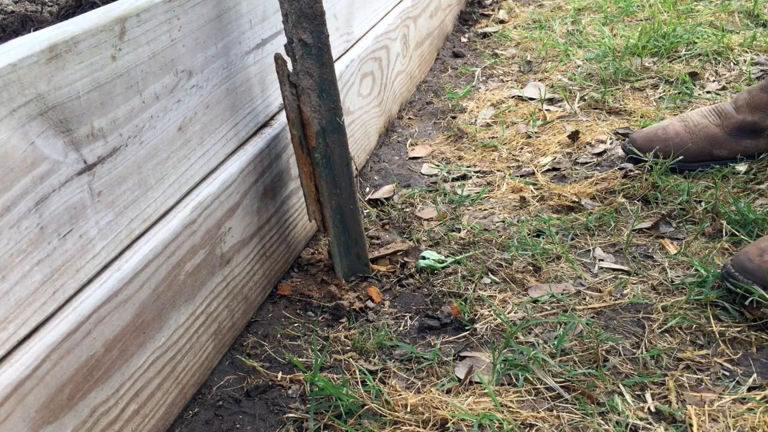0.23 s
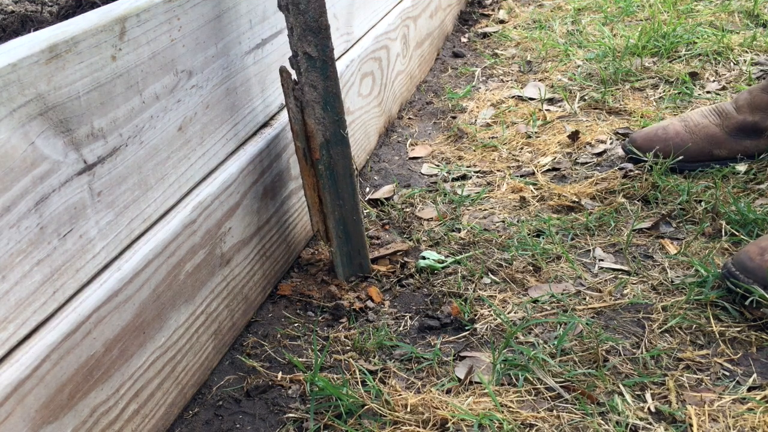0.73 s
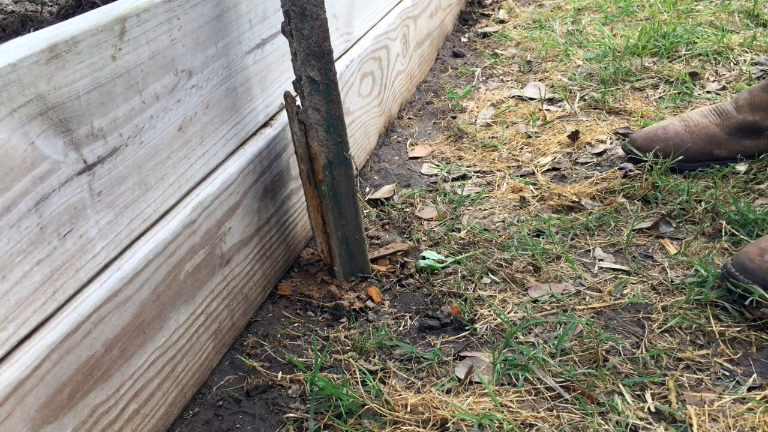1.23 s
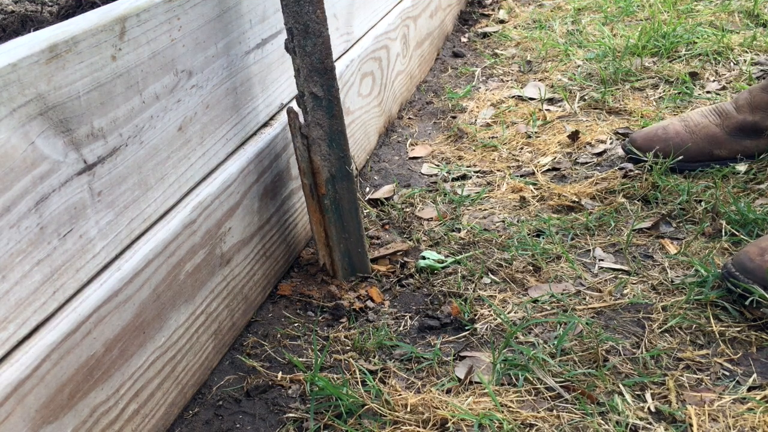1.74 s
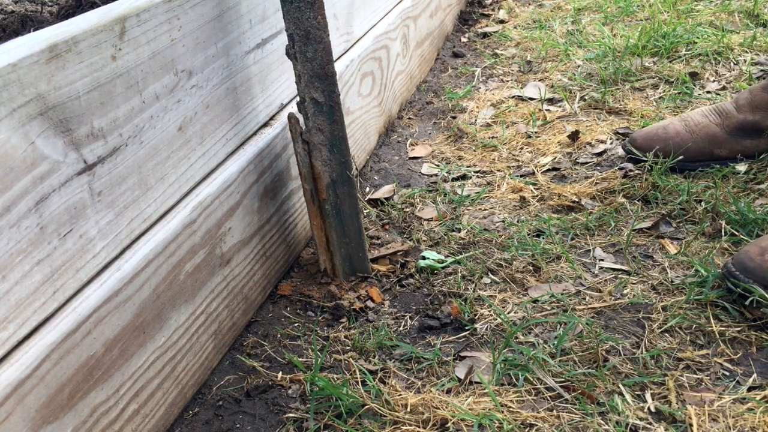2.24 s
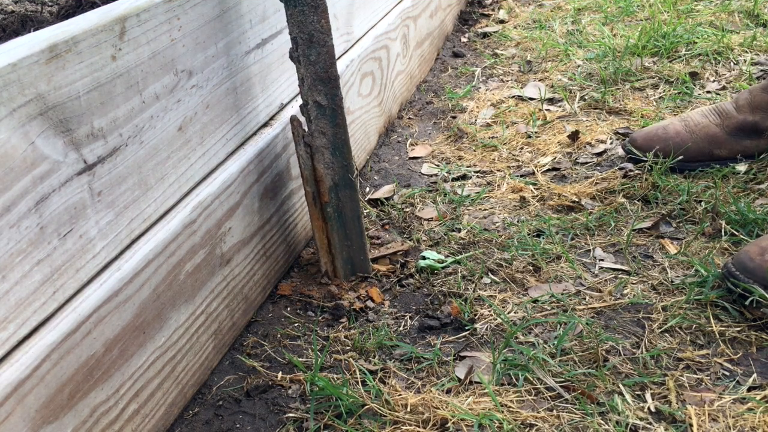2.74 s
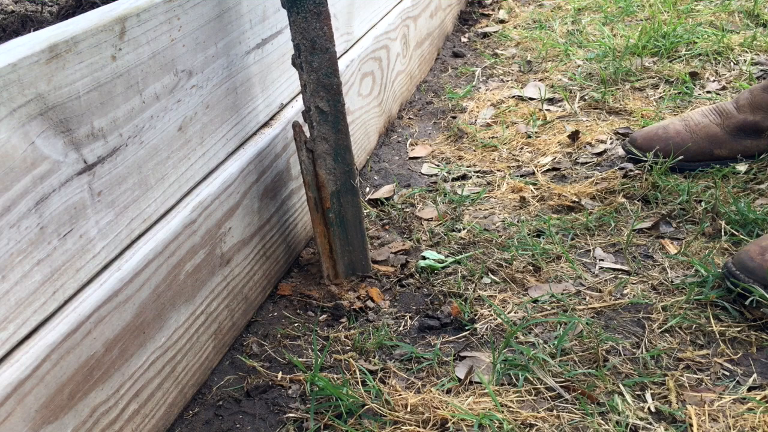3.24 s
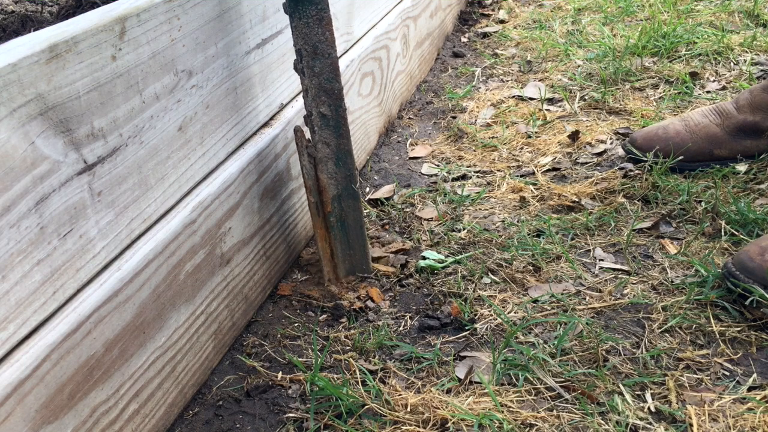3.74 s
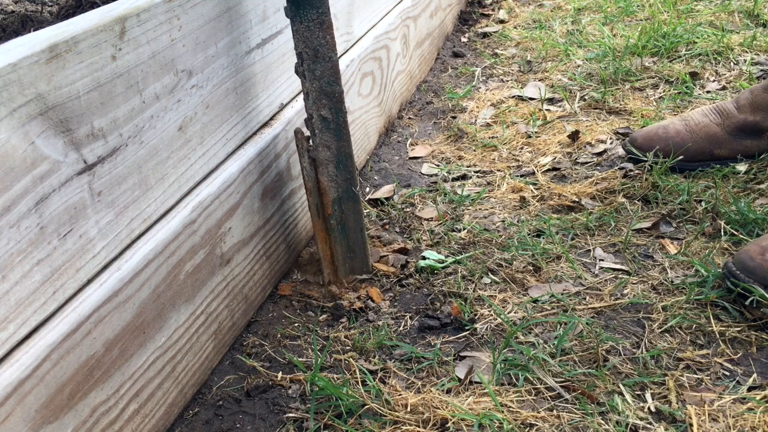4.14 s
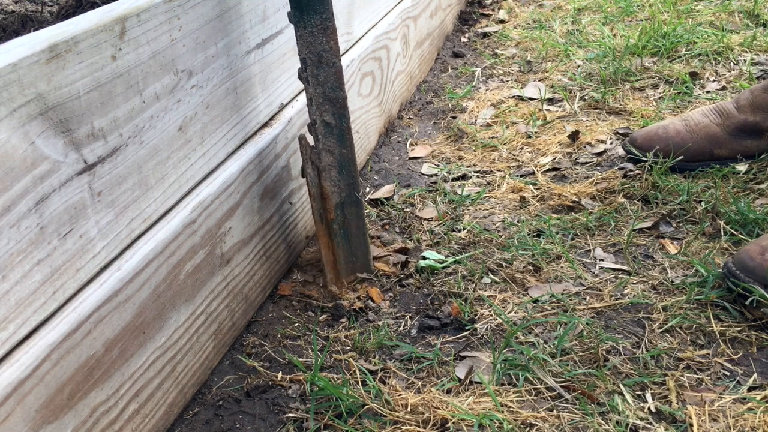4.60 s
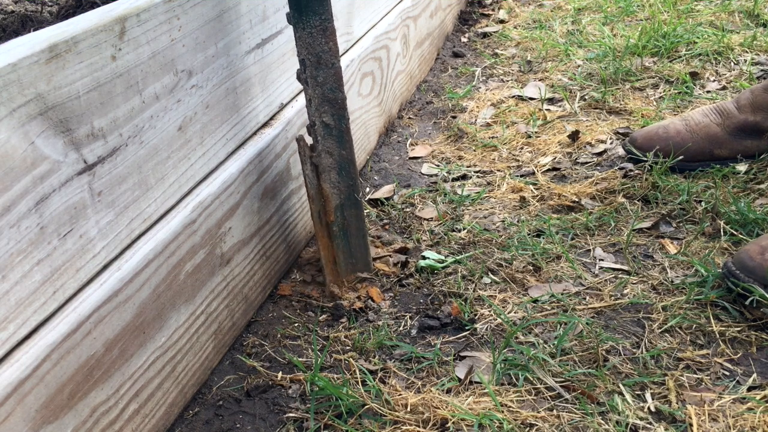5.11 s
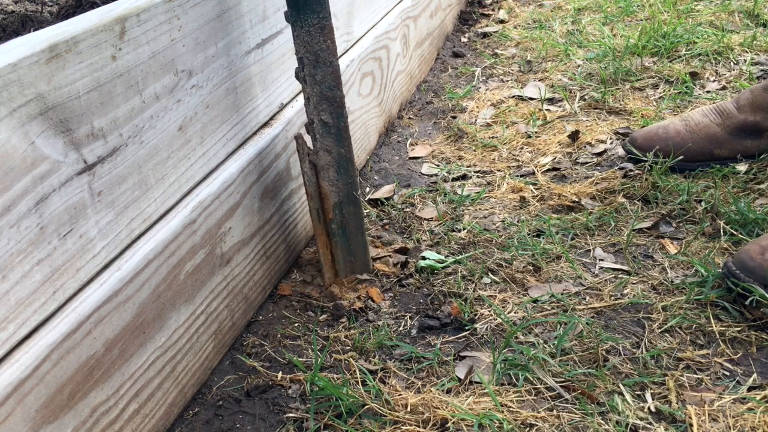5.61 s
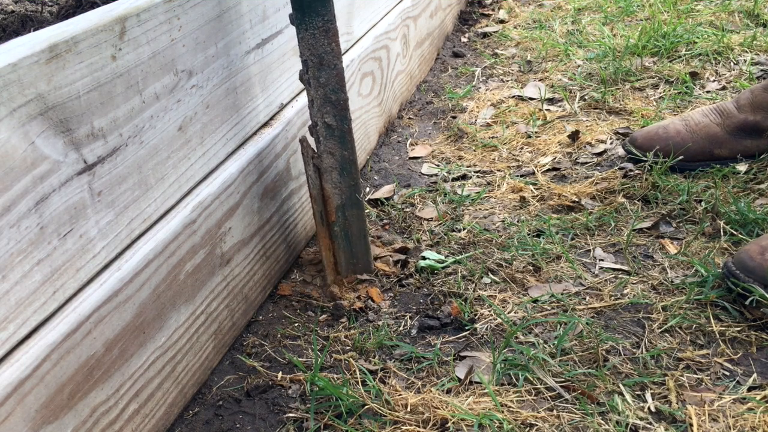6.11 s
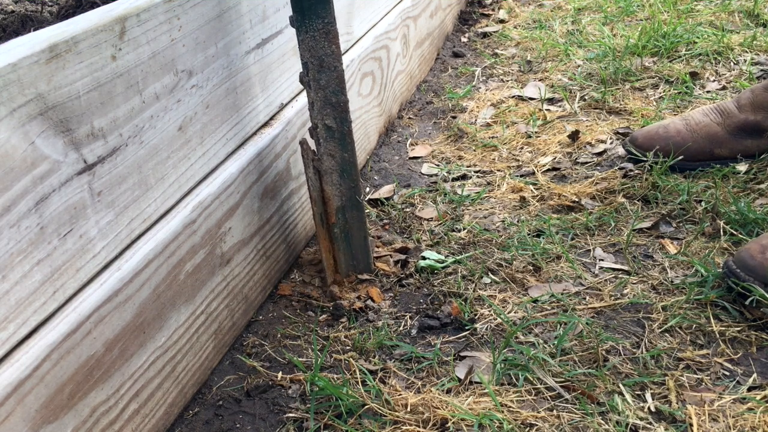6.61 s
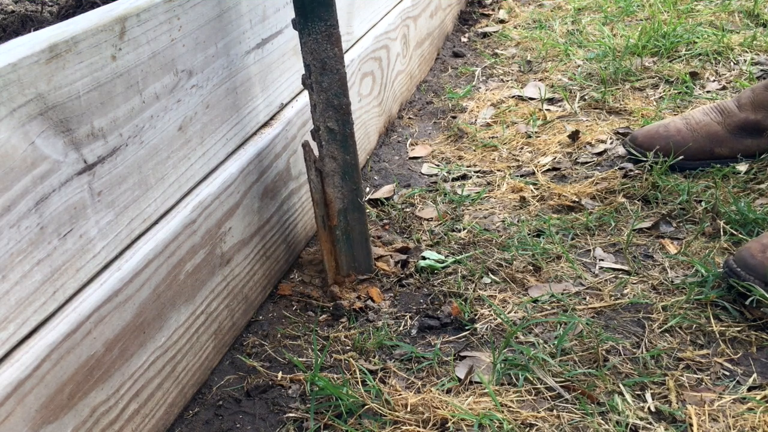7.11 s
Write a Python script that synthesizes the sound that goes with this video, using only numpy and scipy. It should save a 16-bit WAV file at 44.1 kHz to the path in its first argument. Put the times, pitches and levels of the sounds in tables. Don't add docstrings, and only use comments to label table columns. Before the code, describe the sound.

Very close to the microphone, a heavy steel driver strikes a metal fence post in a garden. A leftover echo cuts off, then about a dozen hard blows follow, roughly two a second. Each is a short, choked, clipping clang with a quick rattling bounce, low soil thud and brief ring. Walls return distinct slaps and a bright tail over faint wind and distant air.

```python
import sys
import numpy as np
from scipy import signal
from scipy.fft import rfft, irfft
from scipy.io import wavfile

SR = 44100
rng = np.random.default_rng(int(sys.argv[2]) if len(sys.argv) > 2 else 0)


def amplitude_ratio(level_db):
    exponent = np.asarray(level_db, float) / 20
    return 10 ** exponent


def transcribe(u):
    v = np.clip(np.atleast_2d(u).T, -1, 1)
    q = np.round(v * 32767).astype(np.int16)
    wavfile.write(sys.argv[1], SR, q)


N = 324135


def in_hz(points, hz):
    table_hz, value = np.transpose(points)
    return np.interp(np.log(hz + 1), np.log(table_hz), value)


def coloured(spectrum, size):
    hz = np.arange(size // 2 + 1) * SR / size
    x = irfft(rfft(rng.standard_normal(size)) * amplitude_ratio(in_hz(spectrum, hz)), size)
    return x / np.sqrt(np.mean(x ** 2))


def add(out, start_s, x):
    i = round(start_s * SR)
    skip = max(-i, 0)
    out[i + skip:i + len(x)] += x[skip:N - i]


def struck(hz, level_db, t60, t):
    hz, level_db, t60 = np.array([hz, level_db, t60])[:, :, None]
    phase = 2 * np.pi * rng.random(hz.shape)
    modes = amplitude_ratio(level_db - 60 * t / t60) * np.sin(2 * np.pi * hz * t + phase)
    return np.sum(modes, 0)


def flutter(t, depth_db, rate_hz):
    steps = rng.standard_normal(size=200)
    return amplitude_ratio(depth_db * np.interp(t * rate_hz, np.arange(len(steps)), steps))


# freq_hz, density_db (per Hz)
AIR_SPECTRUM = [(20, -9), (95, -2), (200, -13), (330, -19), (2200, -28.5), (4000, -33), (8000, -40.5),
                (16000, -48)]


def distant_air():
    return amplitude_ratio(-58) * coloured(AIR_SPECTRUM, N)


def wind():
    gust_band = signal.butter(4, [1.2, 16], "band", fs=SR, output="sos")
    gusts = signal.sosfilt(gust_band, rng.standard_normal(N + SR))[SR:]
    return amplitude_ratio(-47) * gusts / np.std(gusts)


# delay_s, level_db, brightness_db (per octave)
WALL_ECHOES = [
    (0.0694, 9, -3),
    (0.1009, 5.5, -1.5),
    (0.133, 1.5, -1.5),
    (0.1803, -5, -5),
    (0.253, -5, -4),
    (0.308, -14, -2.5),
    (.37, -14, -3.5),
]
# freq_hz, t60_s
YARD_DECAY = [(300, 0.25), (1500, 0.9), (3500, 0.98), (8000, 0.95), (12000, .5), (16000, 0.33)]
# freq_hz, level_db
YARD_TONE = [(200, -24.5), (900, -23), (1500, -14), (2200, -8.5), (5000, -9), (9000, -3), (12000, -5),
             (16000, -7)]


def yard_response():
    t = np.arange(SR) / SR
    response = np.zeros(SR)
    edges_hz = 180 * 2 ** np.arange(0, 6.8, .25)
    white = rng.standard_normal((2, SR)) * flutter(t, 2, 65)
    smear = rng.standard_normal(SR // 40) * np.exp(-t[:SR // 40] / .002)
    smear /= np.linalg.norm(smear)
    delay_s, level_db, bright_db = np.transpose(WALL_ECHOES)
    for k, (low, high) in enumerate(zip(edges_hz, edges_hz[1:])):
        hz = np.sqrt(low * high)
        tail_in = np.clip((t - .03) / 0.025, 0, 1)
        tail = amplitude_ratio(-32.5 - 60 * t / in_hz(YARD_DECAY, hz)) * tail_in * white[k % 2]
        echoes = np.zeros(SR)
        echo_db = level_db - 11.5 + bright_db * np.log2(hz / 2500)
        echoes[(delay_s * SR).astype(int)] = amplitude_ratio(echo_db) * (-1) ** k
        sound = tail + signal.fftconvolve(echoes, smear)[:SR]
        band = signal.butter(2, [low, high], "band", fs=SR, output="sos")
        response += amplitude_ratio(in_hz(YARD_TONE, hz)) * signal.sosfilt(band, sound)
    return response


# freq_hz, t60_s
GROUND_MODES = [
    (65.4, 0.43),
    (144.4, 0.32),
    (105, 0.095),
]


def ground_thud(drive_db, square_db, soil_db, t):
    hz, t60 = np.transpose(GROUND_MODES)
    plank_db = -40 - 0.2154 * square_db
    jolt_db = -33 + 0.5 * drive_db
    return struck(hz, [soil_db, plank_db, jolt_db], t60, t) * np.minimum(t / 0.0039, 1)


# freq_hz, level_db (against the yard share), t60_s
DRIVER_HUM = [(2136, -19.5, 0.81), (2160, -21, 0.8), (1770, -25, 0.58), (2486, -25.5, 1), (2600, -25, 0.42)]


def driver_hum(drive_db, yard_db, t):
    level = amplitude_ratio(yard_db + 0.47 * drive_db)
    swell = np.minimum(t / 0.065, 1)
    return level * struck(*np.transpose(DRIVER_HUM), t) * swell * flutter(t, 4, 49)


# multiple (of POST_HZ), t60_s, wall_db (extra towards the walls),
# level_db, growth_db (per dB of squareness)
POST_WAVES = [(2, 0.07, -1, -5.5, 0.68), (3, 0.089, -3, -10, 1.3), (5, 0.11, 1, -15, 1.73),
              (6, 0.064, 5.5, -14, 1.25), (10, 0.038, -10.5, -21.5, 3.05)]
POST_HZ = 1260.5


def post_ring(square_db, t):
    multiple, t60, wall_db, base_db, growth = np.transpose(POST_WAVES)
    hz, ring_db = multiple * POST_HZ, base_db + growth * square_db
    near = np.zeros(len(t))
    for mode_hz, mode_db, mode_t60 in zip(hz, ring_db, t60):
        near += struck([mode_hz], [mode_db], [mode_t60], t) * flutter(t, 4.5, 140)
    return near, struck(hz, ring_db + wall_db, t60, t)


# freq_hz, level_db, longer (t60 relative to the blow)
BENDING_MODES = [(913, -20.5, 0.67), (1105.5, -19, 0.54), (1287.3, -14.5, 0.64), (1509.5, -16, 0.74),
                 (1815.6, -16, 1), (1986, -15, 0.8), (2186, -25, 1.1), (2188, -10, 0.64), (2250, -10, 0.38),
                 (2897, -16, 0.81), (3060, -13.5, 0.95), (3301, -7, 0.49), (3458, -9, 0.69),
                 (3642, -11, 0.45), (3951, -10, 0.64), (4205, -16, 0.86), (4516, -11, 0.5),
                 (4717, -16, 0.25), (4832, -14, 0.4), (5118, -12, 0.4), (5210, -13.5, 0.13),
                 (6180, -24.5, 0.41), (6850, -23, 1.1), (8370, -19.5, 0.11), (8400, -18.5, 0.51),
                 (8900, -32.5, 0.29)]
# freq_hz, density_db (per Hz)
CRASH_SPECTRUM = [(40, -32), (130, -14), (450, -10.5), (1500, -6.5), (2300, 4.5), (3500, -3), (6000, -3.5),
                  (10000, -14.5), (15500, -26.5), (17000, -57)]


def clang(t60):
    t = np.arange(SR // 4) / SR
    rattle = np.interp(t, np.arange(100) / 400, rng.standard_normal(100))
    hz, level_db, longer = np.transpose(BENDING_MODES)
    level_db = level_db + 3.0 * rng.standard_normal(len(hz))
    crash = amplitude_ratio(-6.0) * coloured(CRASH_SPECTRUM, len(t)) * amplitude_ratio(-60 * t / (0.85 * t60))
    modes = amplitude_ratio(-2) * struck(hz, level_db, t60 * longer, t)
    contact = np.minimum(t / 0.0016, 1) ** 2
    return (modes + crash) * contact * amplitude_ratio(2.5 * rattle)


def earlier_tail(room):
    t = np.arange(N) / SR
    multiple, t60, _, base_db, _ = np.transpose(POST_WAVES)
    ring = struck(multiple * POST_HZ, base_db - 4, t60, t[:SR // 4])
    blow = amplitude_ratio(-22) * (clang(0.093) + ring)
    tail = np.zeros(N)
    add(tail, -.19, signal.fftconvolve(blow, room))
    return tail + .045 * np.sin(2 * np.pi * 4.3 * t)


# start_s, drive_db, t60_s
BOUNCES = [(0.5254, -7, 0.03), (0.5318, -14, 0.046), (0.994, -16, 0.08), (1.5600, -8, 0.083),
           (1.5750, -13, 0.036), (2.069, -5, 0.057), (2.563, -12, 0.085), (3.0600, 1, 0.061),
           (3.0750, -5.5, 0.03), (3.5850, 1, 0.07), (3.599, -19, 0.069), (4.086, -3.5, 0.072),
           (4.6170, -3, 0.09), (5.149, -14, 0.1), (5.854, -6.5, 0.11), (5.875, -9.5, 0.048),
           (6.447, 1.5, 0.077), (6.464, -13.5, 0.092), (7.022, -2.5, 0.093), (7.0400, -16.5, 0.057)]


def hit_with_bounces(start_s, drive_db, t60):
    hit = np.zeros(SR * 3 // 4)
    add(hit, 0, amplitude_ratio(drive_db) * clang(t60))
    for bounce_s, bounce_db, bounce_t60 in BOUNCES:
        if 0 < bounce_s - start_s < .06:
            add(hit, bounce_s - start_s, amplitude_ratio(bounce_db) * clang(bounce_t60))
    return hit


# start_s, drive_db, clang_t60_s, squareness_db, soil_thud_db
DRIVER_BLOWS = [(0.4938, 5, 0.085, -6, -51), (0.962, 0.5, 0.083, -8, -45.5),
                (1.0467, -11.5, 0.079, -25.5, -52), (1.1546, -12, 0.07, -25.5, -45),
                (1.531, 7, 0.056, -4.5, -39.5), (2.0521, 3.5, 0.06, -9, -33), (2.545, 4.5, 0.069, -6, -32),
                (3.0425, 6, 0.064, 1.5, -37), (3.5650, 0.5, 0.072, 1.5, -37), (4.0669, 13, 0.06, -1.5, -33),
                (4.5955, 8.5, 0.045, 5, -38.5), (5.125, 13, 0.06, -0.5, -48),
                (5.8329, 5.5, 0.064, 1.5, -42), (6.4260, 10, 0.054, 4.5, -37), (7.0003, 5, 0.083, 4, -45.5)]


def driven_post():
    near, far, ground = np.zeros(N), np.zeros(N), np.zeros(N)
    t = np.arange(SR * 3 // 4) / SR
    for start_s, drive_db, t60, square_db, soil_db in DRIVER_BLOWS:
        yard_db = -25 - 0.1276 * drive_db
        hit = hit_with_bounces(start_s, drive_db, t60)
        ring_near, ring_far = post_ring(square_db, t)
        add(near, start_s, hit + ring_near + driver_hum(drive_db, yard_db, t))
        add(far, start_s, amplitude_ratio(yard_db) * (hit + ring_far))
        add(ground, start_s, ground_thud(drive_db, square_db, soil_db, t))
    return near, far, ground


# start_s, offset (signed, of full scale)
DIAPHRAGM_SHOVES = [
    (.495, -.5),
    (1.531, -.64),
    (3.042, 1.2),
    (4.067, -.95),
    (5.125, -.9),
    (6.426, .19),
]


def diaphragm():
    out, t = np.zeros(N), np.arange(SR) / SR
    quick_s, slow_s, rise_s = .045, .15, 0.0017
    sag = (slow_s * np.exp(-t / quick_s) - quick_s * np.exp(-t / slow_s)) / (slow_s - quick_s)
    shape = sag * (1 - np.exp(-t / rise_s))
    for start_s, offset in DIAPHRAGM_SHOVES:
        add(out, start_s, offset * shape)
    return out


def shove_tones():
    out, t = np.zeros(N), np.arange(SR // 4) / SR
    for start_s, offset in DIAPHRAGM_SHOVES:
        tones = struck([130, 175], [-23.5, -27], [.12, .08], t)
        add(out, start_s, abs(offset) * tones * np.minimum(t / .004, 1))
    return out


def ducking():
    dip_db, t = np.zeros(N), np.arange(SR) / SR
    for start_s, drive_db, *rest in DRIVER_BLOWS:
        add(dip_db, start_s, -.25 * (drive_db + 15.0) * np.exp(-t / 0.5))
    for start_s, offset in DIAPHRAGM_SHOVES:
        add(dip_db, start_s, -8 * abs(offset) * np.exp(-t / 0.23))
    return amplitude_ratio(dip_db)


def overload(x):
    rail = .5
    return x / (1 + np.abs(x / rail) ** 10) ** .1


def scene():
    change_s = .1672
    t = np.arange(N) / SR
    near, far, ground = driven_post()
    room = yard_response()
    earlier = earlier_tail(room) * (t < change_s)
    quiet = distant_air() * ducking() + wind()
    fade_in = np.clip((t - change_s - .008) / .03, 0, 1)
    fade = np.where(t < change_s, 1, fade_in)
    yard = signal.fftconvolve(far, room)[:N]
    mix = near + yard + diaphragm() + quiet * fade + earlier
    return (overload(mix) + ground + shove_tones())[None]


def top_cut(x):
    return signal.sosfilt(signal.butter(12, 17100, fs=SR, output="sos"), x)


def record(dry):
    low_pass = signal.cheby2(10, 60, 17300, fs=SR, output="sos")
    return top_cut(signal.sosfilt(low_pass, dry))


dry = scene()
out = record(dry)
transcribe(out)
```